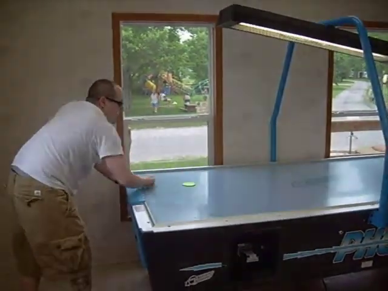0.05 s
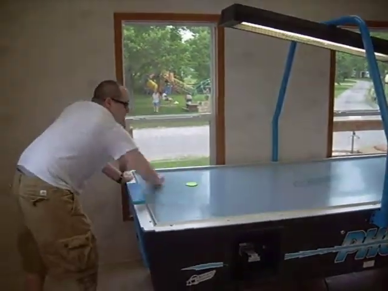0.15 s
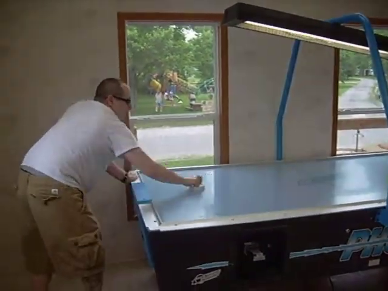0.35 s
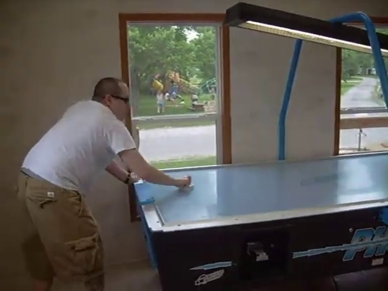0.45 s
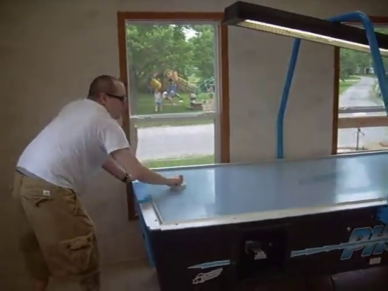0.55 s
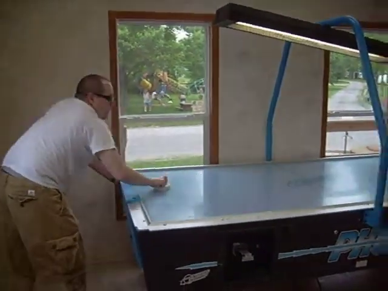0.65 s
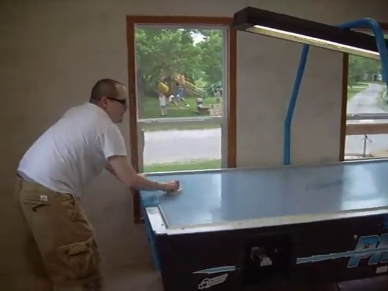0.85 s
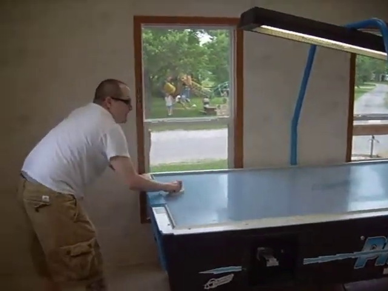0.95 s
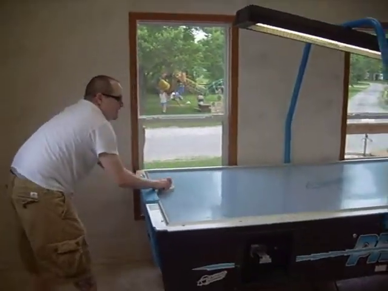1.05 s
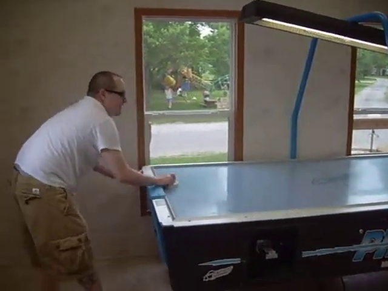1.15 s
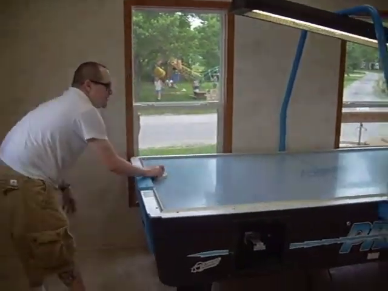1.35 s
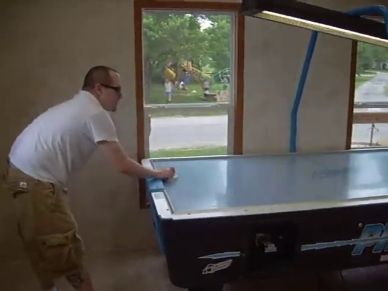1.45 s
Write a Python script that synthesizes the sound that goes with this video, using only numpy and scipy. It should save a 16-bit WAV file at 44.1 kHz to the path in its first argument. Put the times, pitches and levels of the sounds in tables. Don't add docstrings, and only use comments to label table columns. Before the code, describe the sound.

An air hockey puck is lightly tapped from 0.14 s, then struck hard by the mallet at 0.23 s with a low table thud. It rattles on the near rail at 0.37 s, cracks loudest on the end wall at 0.52 s, then knocks faintly at 0.93, 1.06 and a double at 1.17 s. Bare-room echo, blower hiss and hum, microphone overload and small ticks throughout.

```python
import sys
import numpy as np
from scipy import signal
from scipy.fft import rfft, irfft, next_fast_len
from scipy.io import wavfile
from scipy.ndimage import map_coordinates

SR = 44100
rng = np.random.default_rng(int(sys.argv[2]) if len(sys.argv) > 2 else 0)


def log_audio(samples):
    frames = np.atleast_2d(samples).T
    limited = np.clip(frames, -1, 1)
    pcm = np.round(limited * 32767).astype(np.int16)
    wavfile.write(sys.argv[1], SR, pcm)


def volts_from_decibels(level):
    exponent = np.asarray(level, float) / 20
    return 10 ** exponent


N = 66150

# (frequency [Hz], gain [dB])
MIC = [(100, 4), (500, -1), (1000, 0), (4300, 4.53), (5000, -5.5), (6500, -11), (10000, -30)]


def mallet():
    # (time [s], level [dB], direct ring over room [dB], ring [Hz], ring length [s])
    strikes = [
        (.2266, -4, 6.1, 3280, 0.0043),
        (.289, -22, 18.5, 3354, 0.0074),
    ]
    # (centre [Hz], width [Hz], level [dB])
    struck = [(776, 620, -7.5), (1620, 3600, -2), (2706, 610, 3), (3280, 550, 9), (3700, 450, 7),
              (4030, 200, -9), (7850, 930, 4)]
    return knocks(strikes, struck)


def mallet_taps():
    # (time [s], level [dB], direct ring over room [dB], ring [Hz], ring length [s])
    touches = [
        (.1372, -28, 6, 3120, 0.0023),
        (.1845, -35.5, 0, 3190, 0.0041),
        (.189, -29.5, 8.5, 2960, 0.0045),
    ]
    # (centre [Hz], width [Hz], level [dB])
    struck = [(1037, 1800, 9), (2000, 1200, 6.5), (3150, 330, 11.5), (4300, 1200, -33)]
    return knocks(touches, struck)


def table_thud():
    # (time [s], level [dB], direct ring over room [dB], ring [Hz], ring length [s])
    push = [
        (.236, -32, 6.5, 716.4, 0.054),
    ]
    # (centre [Hz], width [Hz], level [dB])
    struck = [(565, 260, 0), (896, 200, 0.5)]
    return knocks(push, struck)


def near_rail():
    # (time [s], level [dB], direct ring over room [dB], ring [Hz], ring length [s])
    rattle = [
        (.362, -23.5, 2.5, 3300, 0.0013),
        (.3672, -11.5, 8.6, 3150, 0.0046),
        (.3712, -18, 15, 2660, 0.0012),
    ]
    # (centre [Hz], width [Hz], level [dB])
    struck = [(960, 700, -25.5), (1890, 1400, 1), (3000, 170, 9.5), (3280, 360, 7.5), (4070, 610, -22),
              (7560, 400, 8.5)]
    return knocks(rattle, struck)


def end_wall():
    # (time [s], level [dB], direct ring over room [dB], ring [Hz], ring length [s])
    crack = [
        (.5152, 0.58, 1.5, 2032, 0.0039),
    ]
    # (centre [Hz], width [Hz], level [dB])
    struck = [(378, 236, -11.5), (870, 50, -5.5), (1440, 1240, -6.5), (1972, 137, 4.5), (2310, 1800, -9),
              (3257, 560, 3), (4136, 120, 4), (5620, 2150, -5.5)]
    return knocks(crack, struck)


def far_rail():
    # (time [s], level [dB], direct ring over room [dB], ring [Hz], ring length [s])
    clatter = [
        (.9268, -19, 5.7, 3050, 0.0044),
        (1.056, -24.5, 5.3, 3050, 0.0029),
    ]
    # (centre [Hz], width [Hz], level [dB])
    struck = [(970, 800, -4.5), (1370, 600, 1), (1844, 920, 4), (3150, 380, 3.5), (4540, 1700, -39)]
    return knocks(clatter, struck)


def far_wall():
    # (time [s], level [dB], direct ring over room [dB], ring [Hz], ring length [s])
    double = [
        (1.163, -28.5, 2, 3000, .004),
        (1.169, -26, 4, 3182, 0.0051),
    ]
    # (centre [Hz], width [Hz], level [dB])
    struck = [(1050, 1400, -5.5), (2050, 1000, -0.5), (3050, 520, 1.5), (3300, 140, -1),
              (4400, 1400, -23.5)]
    return knocks(double, struck)


def knocks(hits, body):
    contact_s, wander_rad = 0.0024, 0.13
    out = np.zeros(N + 2 * SR)
    for start_s, db, direct_db, ring_hz, length_s in hits:
        room = room_tail()
        t = np.arange(len(room)) / SR
        shape = (1 - np.exp(-t / contact_s)) * np.exp(-(t / length_s) ** 4)
        drift = wander_rad * np.cumsum(rng.standard_normal(len(t)))
        ring = np.sin(2 * np.pi * ring_hz * t + drift)
        rattle = rng.standard_normal(len(t))
        direct = volts_from_decibels(direct_db) * shape * (ring + rattle)
        out[round(start_s * SR):][:len(t)] += volts_from_decibels(db) * (room + direct)
    return signal.fftconvolve(out[:N], ringing(body))[:N]


def ringing(body):
    skirt = 1.6
    f = np.fft.rfftfreq(8192, 1 / SR)
    power = 0
    for centre, width, db in body:
        damping = (f * width) ** 2
        power = power + volts_from_decibels(2 * db) * (damping / ((centre ** 2 - f ** 2) ** 2 + damping)) ** skirt
    cepstrum = irfft(np.log(power + 1e-9) / 2)
    cepstrum = cepstrum * np.r_[1, np.full(len(f) - 1, 2), np.zeros(len(f) - 2)]
    response = irfft(np.exp(rfft(cepstrum)))
    return response / np.linalg.norm(response)


def room_tail():
    # (frequency [Hz], time to fall 60 dB [s])
    decay = [(200, 0.46), (1000, 1.053), (2500, 0.93), (4000, 0.74), (8000, 0.41)]
    build_s, early_s, early_db = 0.0073, 0.018, 1.5
    hz, t, bins = signal.stft(rng.standard_normal(SR + SR // 4), SR, nperseg=256)
    fading = bins * volts_from_decibels(-60 * t / along(decay, hz)[:, None])
    tail = signal.istft(fading, SR, nperseg=256)[1]
    t = np.arange(len(tail)) / SR
    return tail * (1 - np.exp(-t / build_s)) * (1 + volts_from_decibels(early_db) * np.exp(-t / early_s))


def blower():
    # (frequency [Hz], density [dB per Hz])
    air = [(30, -35.5), (130, -18), (450, -13), (2600, -14.5), (3150, -5.5), (3700, -16), (5000, -32.5),
           (9000, -51)]
    # (frequency [Hz], level [dB, 8 dB below the sine's peak])
    mains = [(59, -62), (119, -72.5)]
    hiss_db, sway_db = -46.5, 0.9
    t = np.arange(N) / SR
    sway = map_coordinates(rng.standard_normal(40), [t * 20])

    def air_colour(f):
        return volts_from_decibels(along(air, f) - along(MIC, f)) * (f < 9500)

    hiss = unit(filtered(rng.standard_normal(N), air_colour))
    hum = sum(volts_from_decibels(db + 8 - along(MIC, hz)) * np.sin(2 * np.pi * hz * t) for hz, db in mains)
    return volts_from_decibels(hiss_db + sway_db * sway) * hiss + hum


def unit(x):
    return x / np.sqrt(np.mean(x ** 2) + 1e-20)


def along(points, hz):
    f, v = np.transpose(points)
    return np.interp(np.log(hz + 1), np.log(f + 1), v)


def filtered(x, response):
    m = next_fast_len(len(x) + SR // 4)
    return irfft(rfft(x, m) * response(np.fft.rfftfreq(m, 1 / SR)), m)[:len(x)]


def scene():
    puck = mallet_taps() + mallet() + table_thud() + near_rail() + end_wall() + far_rail() + far_wall()
    return (puck + blower())[None]


def ticks():
    join_frames = [1, 2, 6, 8, 9, 11, 15, 16, 17, 18, 19, 21, 22, 23, 24, 29, 30, 31, 38, 39, 40]
    # (level [dB], share of plain spike [0-1], slow settling [share of spike])
    join_ticks = [(-41, 0.6, 0.1), (-48, .4, .01), (-27, 0.27, 0.6), (0, .9, 0.17), (-13, 1, 0.76),
                  (-9, 1, 0.6), (-17.5, 1, .4), (0, 2.3, 0.13), (-2.5, 0, 0.37), (-5, .6, .05),
                  (-14, .6, .05), (-18, 0.7, .02), (-17, 0, 0.4), (-16, .9, 0.3), (-8, 0.7, 0.02),
                  (-21.5, 1, 0.44), (-30, .4, 0.3), (-21.5, 1, 0.9), (-18.5, 1, 0.2), (-21, 1, .02),
                  (-35.5, .3, 0.1)]
    first_s, frame_s, settle_s = 0.0029, 1 / 30, 0.0002
    at = np.round((first_s + frame_s * np.array(join_frames)) * SR).astype(int)
    db, spike, settle = np.transpose(join_ticks)
    size = volts_from_decibels(db) * 2 * np.sign(rng.standard_normal(len(at)))
    out, slow = np.zeros(N), np.zeros(N)
    out[at] = size
    out[at + 2] = -size * (1 - np.clip(spike, 0, 1))
    slow[at] = size * settle
    return out + signal.lfilter([1], [1, -np.exp(-1 / (settle_s * SR))], slow)


def roll_off(x):
    return signal.sosfilt(signal.butter(12, 16810, fs=SR, output="sos"), x)


def record(dry):
    limit_db, react_s, ratio = -8.5, 0.0042, 0.95
    grit_db = -32
    clip, hardness = 0.715, 16
    band_hz, image_db, top_hz = 10960, -6.5, 16100

    def band(f):
        return 1 / (1 + (f / band_hz) ** 24)

    def output_band(f):
        return (volts_from_decibels(image_db) + (1 - volts_from_decibels(image_db)) * band(f)) * (f < top_hz)

    x = filtered(dry[0], lambda f: volts_from_decibels(along(MIC, f)))
    keep = np.exp(-1 / (react_s * SR))
    level = np.sqrt(signal.lfilter([1 - keep], [1, -keep], x ** 2) + 1e-12)
    gain = np.minimum(1, volts_from_decibels(limit_db) / level) ** ratio
    grit = volts_from_decibels(grit_db) * level * rng.standard_normal(N)
    x = filtered(gain * (x + grit) + ticks(), band)
    x = x / (1 + np.abs(x / clip) ** hardness) ** (1 / hardness)
    x = filtered(x, output_band)
    return roll_off(x[None])


dry = scene()
out = record(dry)
log_audio(out)
```